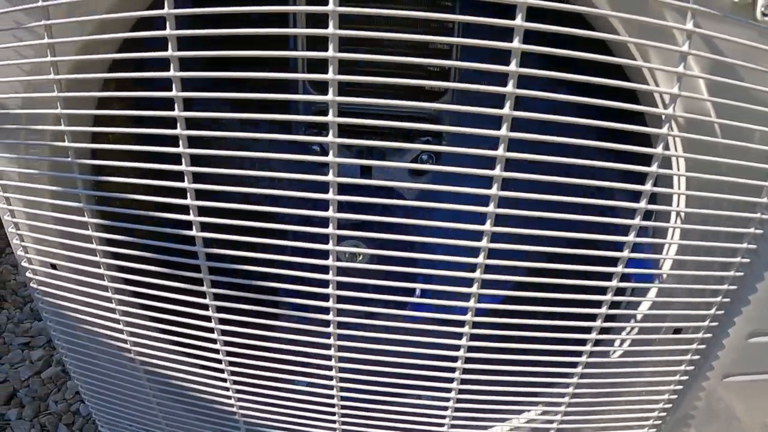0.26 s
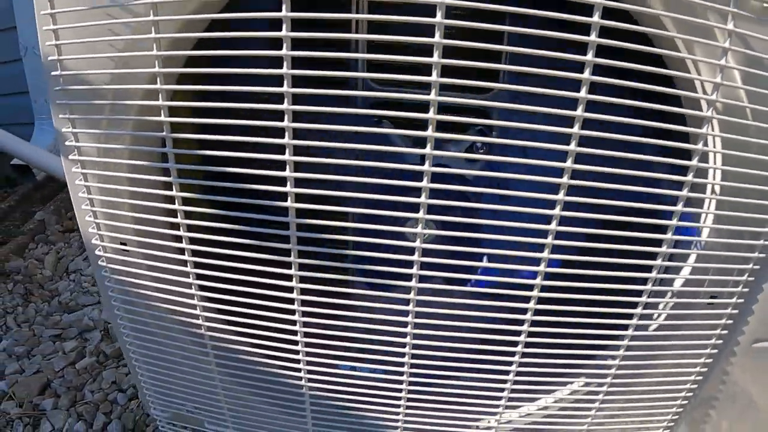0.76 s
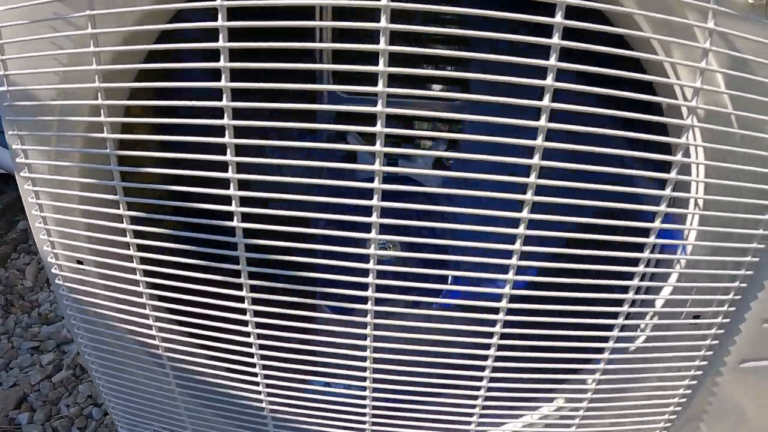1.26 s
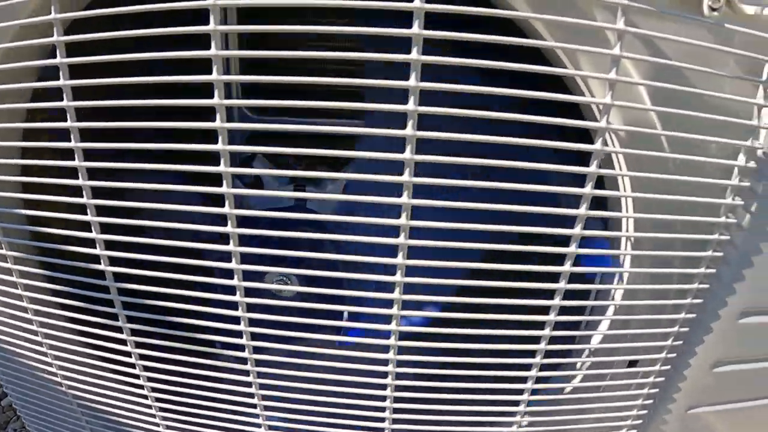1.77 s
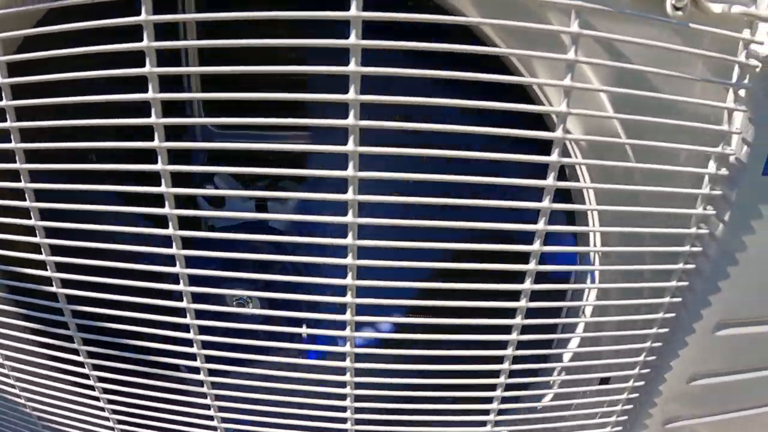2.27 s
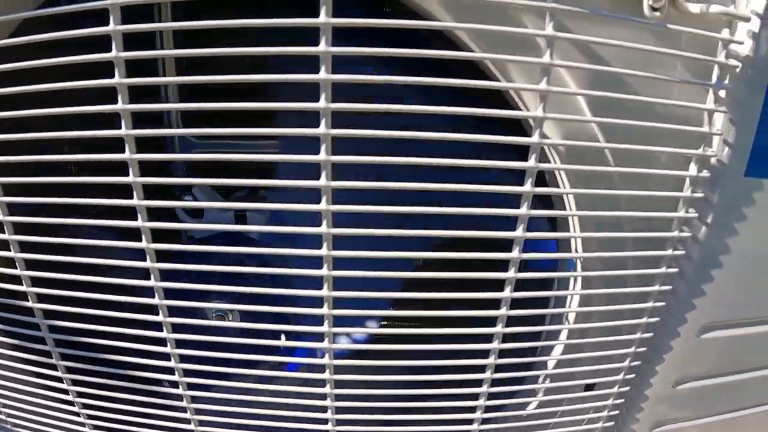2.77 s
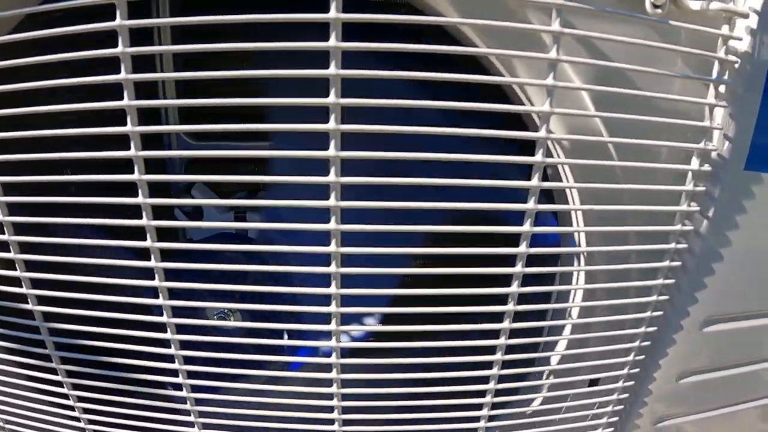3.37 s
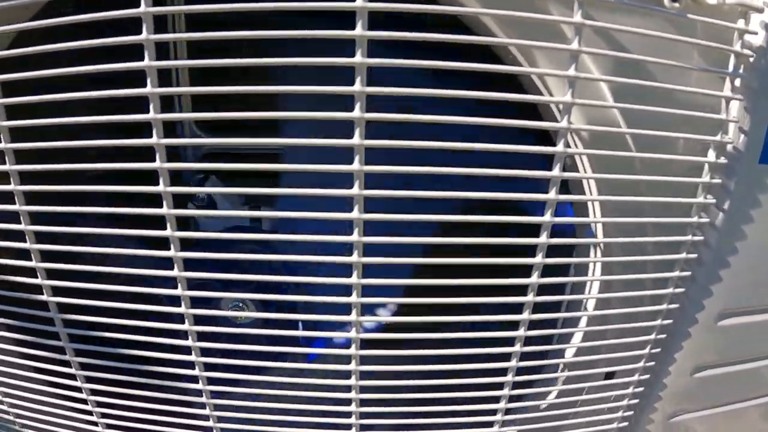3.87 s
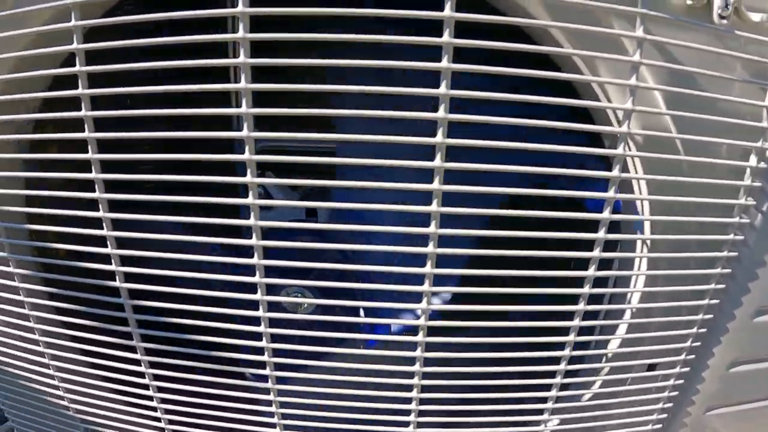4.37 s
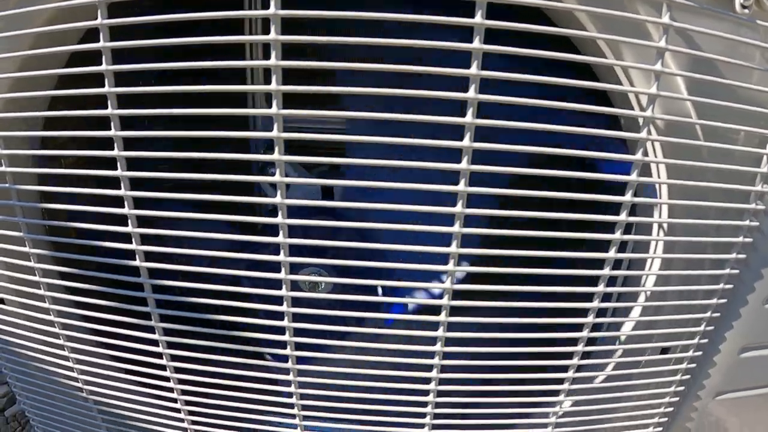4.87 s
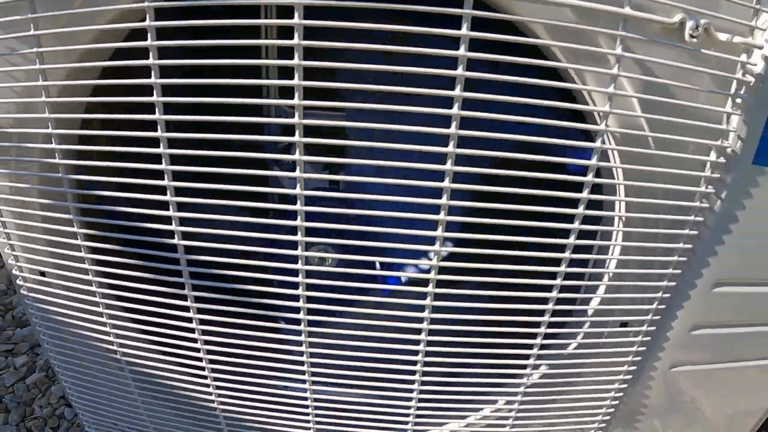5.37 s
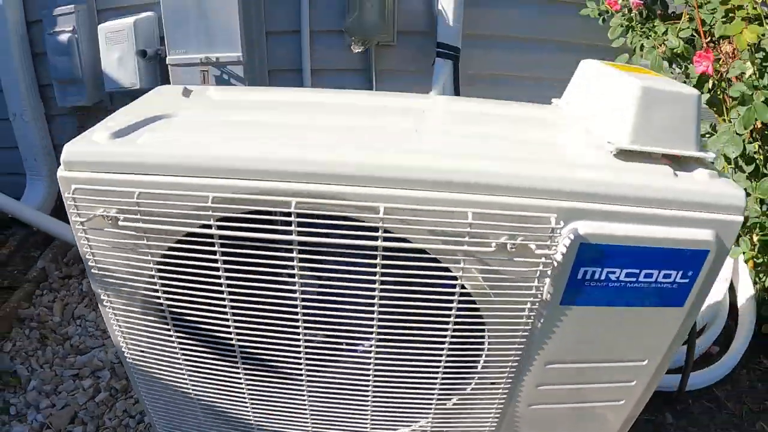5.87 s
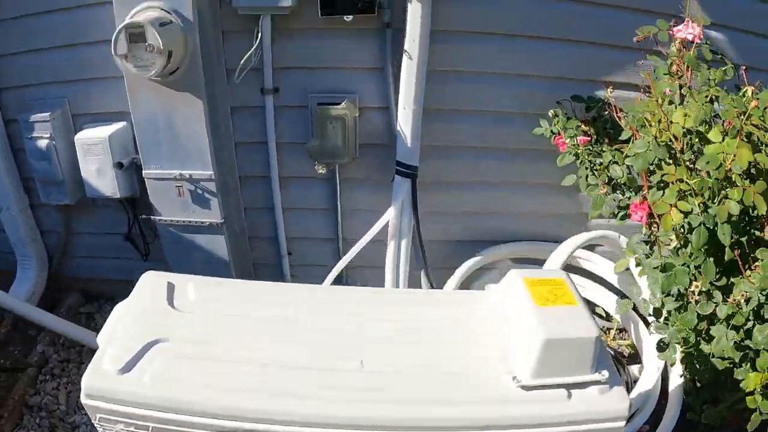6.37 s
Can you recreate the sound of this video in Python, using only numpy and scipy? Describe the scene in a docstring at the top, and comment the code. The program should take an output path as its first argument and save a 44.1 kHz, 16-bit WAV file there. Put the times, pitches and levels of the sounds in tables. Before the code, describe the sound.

A handheld microphone near the grille of an outdoor unit picks up continuous, flickering fan noise, dark and full, over a wavering hum. Deep wind flutter lies underneath; short, blunt gusts slap the membrane, strongest after two seconds and again near the end, some overloading. A faint high hiss and a quick double squeak appear. Finally the sound drops abruptly into a quiet garage with a small tick.

```python
"""An outdoor air conditioner's fan rushes behind its grille, as octaves of flickering noise that follow nearness
and angle; its air stream rumbles and buffets on the microphone as deep noise and short bursts.
Wavering sines make the hum of blades and compressor and the faint whine of the motor drive.
A thin top hiss and two brief squeaks pass by; a last instant is indoors, quiet air with one tick.
A limiter and a rounded input stage overload on the strongest gusts."""
import sys
import numpy as np
from scipy import signal
from scipy.fft import rfft, irfft, next_fast_len
from scipy.io import wavfile
from scipy.ndimage import uniform_filter1d

SR = 44100
rng = np.random.default_rng(int(sys.argv[2]) if len(sys.argv) > 2 else 0)


def master_out(mix):
    """Clip the mix to full scale and print it as 16-bit PCM to the path in sys.argv[1]."""
    frames = np.transpose(np.atleast_2d(mix))
    ceiling = np.clip(frames, -1, 1)
    pcm = np.round(ceiling * 32767).astype(np.int16)
    wavfile.write(sys.argv[1], SR, pcm)


N = 292647
T = np.arange(N) / SR
CUT_S = 6.539  # outdoors before, indoors after

# strong eddies that hit the microphone; length is two standard deviations of the bell:
# centre_s, flap level_db, length_s, top of the flap_hz, top of its core_hz, deep swell level_db
BUFFETS = [(0.072, -25, .02, 400, 1100, -23), (0.121, -25.5, 0.029, 252.5, 600, -20),
           (1.237, -27, 0.018, 509, 1200, -28), (1.51, -28, 0.042, 225, 530, -18),
           (1.775, -20.5, 0.038, 245, 600, -31), (1.894, -29, 0.033, 247, 600, -13),
           (2.091, -35, 0.034, 223, 530, -19.5), (2.207, -22, 0.041, 308, 900, -22),
           (2.377, -11.5, 0.027, 216, 700, -10), (2.554, -15.5, 0.014, 250, 500, -16),
           (2.567, -9, 0.017, 380, 645, -7.5), (2.797, -30, 0.027, 300, 700, -28),
           (2.863, -22, 0.018, 301, 700, -12), (3.033, -16.5, 0.016, 250, 550, -15),
           (3.055, -16, 0.014, 280, 546, -9.5), (3.298, -11, 0.023, 447, 1100, -4),
           (3.325, -12, 0.011, 400, 1400, -22), (3.34, -10.5, 0.017, 492.4, 1000, -22),
           (3.348, -16, 0.0097, 608, 1250, -18), (3.53, -16.5, 0.051, 250.7, 600, -10),
           (3.588, -20, 0.037, 242, 600, -13), (3.753, -22, 0.036, 249, 500, -11),
           (3.825, -18, 0.0091, 400, 1000, -13), (3.829, -11, 0.024, 296, 1200, -13),
           (3.849, -17, 0.026, 439, 800, -17), (4.0, -29, 0.014, 220, 450, -14),
           (4.02, -15.5, 0.022, 290, 600, -24), (4.176, -20, 0.038, 339, 900, -14.5),
           (4.565, -36, 0.027, 225, 530, -13), (4.752, -32, 0.048, 220, 530, -13),
           (5.148, -33, 0.028, 225, 530, -17), (5.32, -28, 0.036, 218, 530, -12),
           (5.45, -16, 0.013, 200, 550, -10.5), (5.498, -23, 0.022, 200, 450, -13),
           (5.592, -22, 0.025, 220, 450, -7), (5.673, -8.5, 0.016, 375.5, 624, -7.5),
           (5.701, -17.5, 0.017, 359, 480, -27), (5.922, -10, 0.043, 307, 900, -5),
           (5.94, -14, 0.011, 481, 800, -21), (5.952, -13, 0.0062, 897, 1180, -24),
           (5.963, -20.5, 0.017, 500, 950, -18), (5.979, -14, 0.011, 295, 480, -18)]


def undb(db):
    """Gain of a level in dB."""
    return 10 ** (np.asarray(db) / 20)


def unit(x):
    """Scaled to rms 1."""
    return x / np.sqrt(np.mean(x ** 2))


def curves(table):
    """Columns of a time table, one value per sample."""
    s, *columns = np.transpose(table)
    return [np.interp(T, s, column) for column in columns]


def walk(rate):
    """Random levels held 1 / rate s and slewed twice; spread 1."""
    steps = 8  # points per held level
    held = np.repeat(rng.standard_normal(size=256), steps)
    slewed = uniform_filter1d(uniform_filter1d(held, size=steps), size=steps)
    return np.interp(T * rate * steps, np.arange(len(held)), unit(slewed))


def noise_spectrum(points):
    """Frequencies and spectrum of a noise with the given colour."""
    size = next_fast_len(N)
    hz = np.arange(size // 2 + 1) * SR / size + 1e-3  # keeps the logarithm finite
    f, db = np.transpose(points)
    colour = undb(np.interp(np.log(hz), np.log(f), db))
    return hz, rfft(rng.standard_normal(size)) * colour


def band(hz, width_hz, size=N):
    """Noise rung twice through one resonance, rms 1."""
    b, a = signal.iirpeak(hz, hz / width_hz, fs=SR)
    once = signal.lfilter(b, a, rng.standard_normal(size))
    return unit(signal.lfilter(b, a, once))


def turbulence(points, octaves, tilt, shared_db, own_db, shared_rate, own_rate):
    """Coloured noise in octave slices; all swell together and each flickers alone. Rms 1 before these and tilt."""
    hz, spectrum = noise_spectrum(points)
    swell = shared_db * walk(shared_rate)
    place = np.log2(np.clip(hz, octaves[0], octaves[-1]))
    out = 0
    for centre in octaves:
        distance = np.clip(place - np.log2(centre), -1, 1)
        share = np.cos(np.pi / 2 * distance) ** 2  # neighbouring slices add up to the whole
        level_db = swell + own_db * walk(own_rate) + tilt(centre)
        out = out + irfft(spectrum * share)[:N] * undb(level_db)
    return out / np.std(irfft(spectrum))


def rush(rush_db, roar_db, hiss_db):
    """Blades and grille stir the air; low roar and top hiss vary with the angle to the grille."""
    # colour of the rush: pitch_hz, relative density_db
    rush_colour = [(90, -3), (160, -2), (260, -3), (450, -0.5), (700, -4.5), (1000, -7.5), (1400, -12),
                   (2000, -16), (3200, -23.5), (4400, -29), (5100, -32.5), (5500, -35.5), (5850, -33.5),
                   (6150, -36), (6600, -40), (6950, -38.5), (7250, -44.5), (8600, -43.5), (10500, -59.5),
                   (12000, -56.5), (13000, -64), (14800, -76.5), (15300, -100)]
    # above the cabinet the rush turns hollow for a moment:
    # centre_s, length_s, pitch_hz, width_hz, share taken out (0 to 1)
    hollows = [(6.2, 0.29, 800, 140, 0.68), (6.36, 0.32, 440, 100, 0.65), (5.5, 0.16, 1600, 200, .4)]
    roar_below_hz, hiss_above_hz = 1200, 6000

    def tilt(hz):
        return roar_db * (hz < roar_below_hz) + hiss_db * (hz > hiss_above_hz)

    octaves = 250 * 2 ** np.arange(6)
    air = undb(rush_db) * turbulence(rush_colour, octaves, tilt, shared_db=0.3, own_db=0.66,
                                     shared_rate=5.4, own_rate=14.)
    for s, length, hz, width, share in hollows:
        b, a = signal.iirpeak(hz, hz / width, fs=SR)
        moment = np.exp(-((T - s) / (length / 2)) ** 4)
        air = air - share * moment * signal.lfilter(b, a, air)
    return air


def stream():
    """Large slow eddies press on the membrane: a deep fluttering rumble that swells under each buffet."""
    # rumble between the gusts: time_s, level_db
    stream_levels = [(0, -31), (.11, -17), (.42, -15), (.65, -23.5), (.85, -20), (1.3, -19), (2.14, -19),
                     (2.19, -14.5), (2.36, -14.5), (2.41, -30), (2.47, -14.5), (2.7, -15.5), (3.5, -17),
                     (4.1, -18), (4.44, -27), (4.6, -15.5), (5.25, -18.5), (5.55, -21), (5.78, -12.5),
                     (6.0, -6.5), (6.07, -25), (6.12, -24.5), (6.3, -31), (6.53, -30.5)]
    # colour of the rumble: pitch_hz, relative density_db
    rumble_colour = [(6, -11.5), (18, -2.5), (38, 0), (52, -3), (70, -3), (100, -5.5), (145, -7),
                     (190, -17), (300, -24), (600, -36), (1200, -61), (5000, -120)]
    flutter_db, flutter_per_s = 1.3, 30.
    swell_s = 0.031  # length of the deep swell under each eddy
    octaves = 30 * 2 ** np.arange(4)
    eddies = turbulence(rumble_colour, octaves, lambda hz: 0, shared_db=1., own_db=1.5,
                        shared_rate=16., own_rate=12.)
    power = undb(curves(stream_levels)[0] + flutter_db * walk(flutter_per_s)) ** 2
    for s, *_, deep_db in BUFFETS:
        power = power + undb(deep_db) ** 2 * np.exp(-((T - s) / (swell_s / 2)) ** 2)
    return eddies * np.sqrt(power)


def buffets():
    """Eddies slap the membrane: bell-shaped noise and flapping, with a brief higher core weaker towards its top."""
    flap_of_top, flap_db = .75, -4  # flap pitch as a share of the top; its level against the eddy's noise
    core_db, core_sharpness = -7.5, 3.1  # core level against the body; power of the bell
    snap = 19  # sudden pressure step mid-eddy, in rms of the core's random steps
    half = SR // 8
    out, t = np.zeros(N + half), np.arange(-half, N) / SR  # starts early, for the first eddy
    for s, db, length, top_hz, core_hz, _ in BUFFETS:
        near = slice(int(s * SR), int(s * SR) + 2 * half)
        bell = np.exp(-.5 * ((t[near] - s) / (length / 2)) ** 2)
        noise, steps = rng.standard_normal((2, 3 * half))  # the first third lets the filters settle
        steps[2 * half] += snap * np.sign(steps[0])
        low_band = signal.butter(3, [100, top_hz], "band", fs=SR, output="sos")
        high_band = signal.butter(2, [top_hz, core_hz], "band", fs=SR, output="sos")
        body = signal.sosfilt(low_band, noise)[half:] * bell
        flap = np.sin(2 * np.pi * (flap_of_top * top_hz * t[near] + rng.random())) * bell
        body = body / np.std(body) + undb(flap_db) * flap / np.std(flap)
        core = signal.sosfilt(high_band, np.cumsum(steps))[half:] * bell ** core_sharpness
        burst = body / np.std(body) + undb(core_db) * core / np.std(core)
        out[near] += undb(db) * np.std(bell) * burst
    return out[half:]


def hum():
    """Tones on multiples of the fan and compressor speeds, each wavering; the high ones are blurred by the air."""
    # cabinet loudness by where the microphone points: time_s, deep throb_db, panel tone_db, higher tones_db
    cabinet = [(0, -0.5, 1, 0), (.6, 0, -2.5, -2), (2.1, -4, -0.5, 0), (3, 2, 2.5, 4), (3.7, -2, -1.7, 1.5),
               (4.9, 4, 1, 5), (5.5, 1.5, -1.5, 0.5), (5.9, -12, -1.5, 3.5), (6.02, -11, -13, -1),
               (6.15, -8, -14, -6), (6.35, -7.5, -2.5, -7), (6.53, -11, -0.5, -4)]
    # fan multiples, then compressor multiples: level_db before the cabinet curves, waver_db
    hum_levels = [(-37, -2), (-25.5, 2.3), (-29, 1), (-33.5, 2), (-34.5, 2), (-42, 2), (-50.5, 2), (-41, 4),
                  (-32, 1.1), (-53, 4)]
    # multiples of the turning speed that are heard; the fan has three blades
    fan_orders = [3, 6, 9, 10, 12, 70, 73]
    compressor_orders = [3, 6, 11]
    fan_turns_per_s, compressor_turns_per_s = 13.35, 61.
    panel_above_hz, high_above_hz = 170, 500
    throb_db, panel_db, high_db = curves(cabinet)
    tones_hz = [k * fan_turns_per_s for k in fan_orders]
    tones_hz += [k * compressor_turns_per_s for k in compressor_orders]
    out = 0
    for hz, (db, waver_db) in zip(tones_hz, hum_levels):
        cabinet_db = high_db if hz > high_above_hz else panel_db if hz > panel_above_hz else throb_db
        level = undb(db + waver_db * walk(12.) + cabinet_db)
        blur = (0.51 + .0009 * hz) * walk(5.) + .0011 * hz * walk(30.)  # radians
        out = out + level * np.sin(2 * np.pi * (hz * T + rng.random()) + blur)
    return np.sqrt(2) * out  # sines of rms 1 before their levels


def whine(rush_db):
    """Narrow unsteady tones of the motor drive, their phase wandering, follow the level of the rush."""
    # tones of the motor drive: pitch_hz
    whine_tones = [4737, 5028, 5781, 5821, 6187, 6858, 6919, 6981]
    # for each tone: peak level_db against the rush, width_hz (rate of the phase wander)
    whine_levels = [(-46, 7.8), (-38.5, 7), (-45, 9.3), (-36, 6), (-47.5, 5.3), (-47.5, 6.1), (-45, 7),
                    (-49.5, 7)]
    out = 0
    for hz, (db, width) in zip(whine_tones, whine_levels):
        tone = np.sin(2 * np.pi * hz * T + 1.2 * walk(width))
        out = out + undb(db + 1.5 * walk(4.5)) * tone
    return undb(rush_db) * out


def thin_hiss():
    """Two faint resonant bands of noise at the top grow in spells, stop short and flicker."""
    # spells: full from_s, level_db before the bands' own, until_s, last level_db likewise, fade-in_s
    spells = [(.42, -71.5, 2.25, -67, .4), (5.4, -70.5, 5.49, -68, 0.44)]
    # bands of the hiss: pitch_hz, width_hz, level_db against the spell
    thin_bands = [(12200, 1000, -4), (13850, 900, -2)]
    fade_db, stop_s = 29.5, .12
    level = 0
    for start, first_db, end, last_db, rise in spells:
        times = [start - rise, start, end, end + stop_s]
        levels_db = [first_db - fade_db, first_db, last_db, last_db - fade_db]
        level = level + undb(np.interp(T, times, levels_db))
    hiss = sum(undb(db) * band(hz, width) for hz, width, db in thin_bands)
    return level * undb(1.5 * walk(15.)) * hiss


def scrape():
    """Short squeaks, roughened by a fast phase wobble and slightly falling, in a swish of noise."""
    # two squeaks: centre_s, level_db before the partials' own, length_s
    squeaks = [(2.299, -28, 0.023), (2.337, -27.5, 0.015)]
    # partials: pitch_hz at the first squeak's centre, level_db against the squeak
    partials = [(1365, 1.5), (2050, -8)]
    # brush of noise around the squeaks: level_db, length_s, pitch_hz, width_hz
    swish_db, swish_length, swish_hz, swish_width = (-40, 0.26, 1700, 900)
    swish_s, sag_hz_per_s, wobble_per_s = 2.28, 500, 66
    s = T - squeaks[0][0]
    wobble = .8 * walk(wobble_per_s)
    tone, level = 0, 0
    for hz, db in partials:
        cycles = (hz - sag_hz_per_s * s / 2) * s
        tone = tone + undb(db) * np.sin(2 * np.pi * cycles + wobble)
    for centre, db, length in squeaks:
        level = level + undb(db) * np.exp(-.5 * ((T - centre) / (length / 2)) ** 2)
    brush = np.exp(-.5 * ((T - swish_s) / (swish_length / 2)) ** 4)
    return tone * level + undb(swish_db) * band(swish_hz, swish_width) * brush


def garage():
    """Quiet indoor air as coloured noise, with one small tick of decaying resonant noise."""
    # colour of the indoor air: pitch_hz, relative density_db
    air_colour = [(20, -14), (50, 6), (110, -7), (300, -13.5), (1500, -21.5), (2600, -27.5), (5000, -35.5),
                  (15500, -53)]
    # tick: level_db, t60_s, pitch_hz, width_hz
    tick_db, t60, tick_hz, tick_width = (-36, .03, 6500, 9000)
    air_db, tick_s = -30, 6.567
    decay = np.exp(-np.log(1000) * np.clip(T - tick_s, 0, 1) / t60)
    tick = undb(tick_db) * band(tick_hz, tick_width) * (T > tick_s) * decay
    air = unit(irfft(noise_spectrum(air_colour)[1])[:N]) * undb(air_db)
    return air * np.clip((T - CUT_S) / 0.025, 0, 1) ** 2 + tick


def scene():
    """Outdoors until the cut, then indoors."""
    # nearness and angle to the grille: time_s, rush level_db, lift of the low roar_db, lift of the top hiss_db
    fan = [(0, -24, -0.5, 1), (.15, -25.5, 1.6, 1.5), (.8, -28.5, 0.4, 2), (1.2, -28.5, 1.3, 1),
           (1.6, -27, -0.5, 1), (2.15, -28.5, 2, 2), (2.28, -25.5, 2.5, 2.5), (2.5, -25.5, 0, 1.5),
           (2.63, -21.5, -0.9, -0.5), (3.4, -22, -0.3, -1), (3.78, -23, -2, -1.5), (4.33, -21, -3, -1.5),
           (4.75, -23, -0.5, 2.5), (5.1, -25.5, 1, 2.2), (5.88, -26, -0.5, 1), (6.04, -28.5, -3, -1),
           (6.2, -30.5, -1, -1.5), (6.35, -29, -2.5, 0), (6.53, -28.5, 0, 2)]
    rush_db, roar_db, hiss_db = curves(fan)
    outdoors = rush(rush_db, roar_db, hiss_db) + stream() + buffets()
    outdoors = outdoors + hum() + whine(rush_db) + thin_hiss() + scrape()
    # the outdoor sound drops at the cut and fades out under the room
    tail = 0.46 * np.clip(1 - (T - CUT_S) / 0.066, 0, 1)
    fade = np.where(T < CUT_S, 1, tail)
    return (outdoors * fade + garage())[None]


def record(dry):
    """A quick limiter ducks under gusts, the input stage rounds off the peaks, the top is cut."""
    threshold, window_s, top_hz = 0.32, 0.016, 15700
    size = uniform_filter1d(np.abs(dry), int(window_s * SR), axis=1)
    held = dry * np.minimum(1, threshold / (size + 1e-9)) ** .5  # ratio 2:1
    rounded = held / (1 + np.abs(held) ** 8) ** (1 / 8)
    top_cut = signal.ellip(8, .2, 70, top_hz, fs=SR, output="sos")
    return signal.sosfilt(top_cut, rounded)


dry = scene()
out = record(dry)
master_out(out)
```